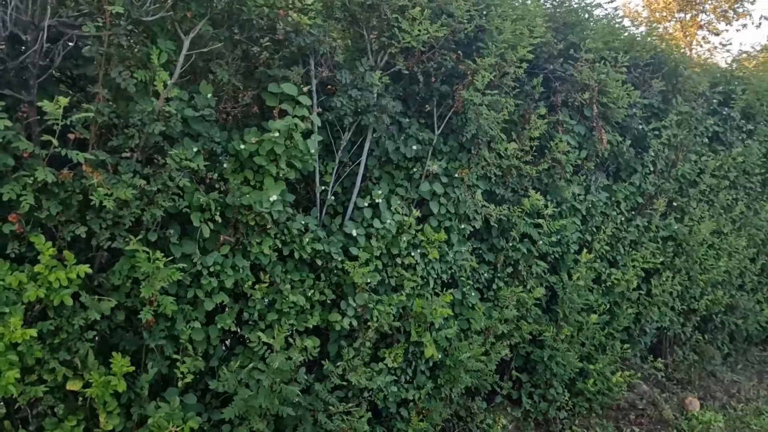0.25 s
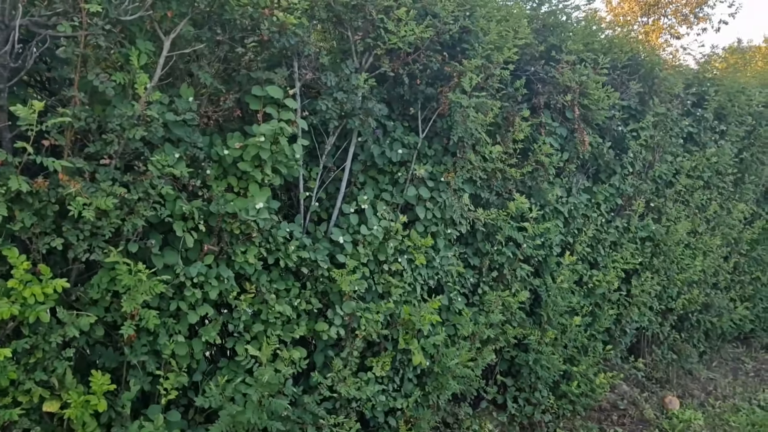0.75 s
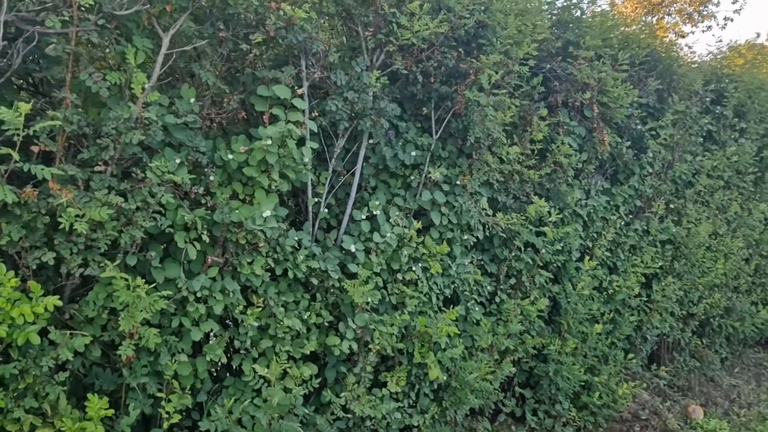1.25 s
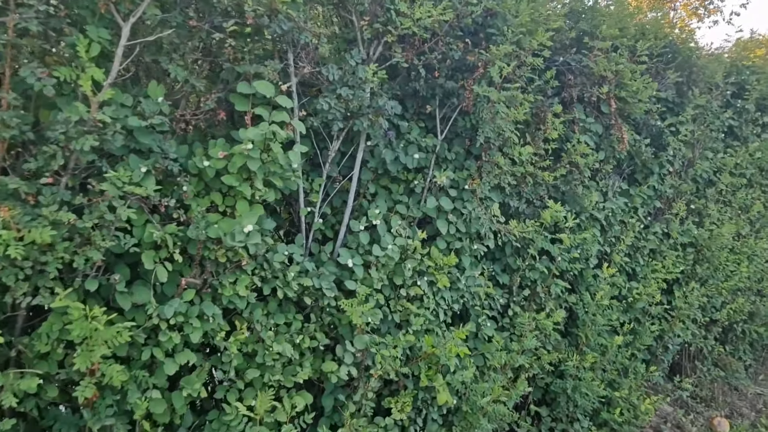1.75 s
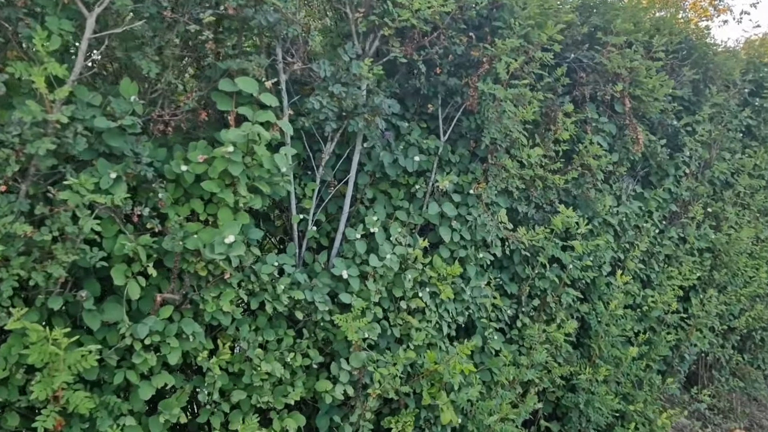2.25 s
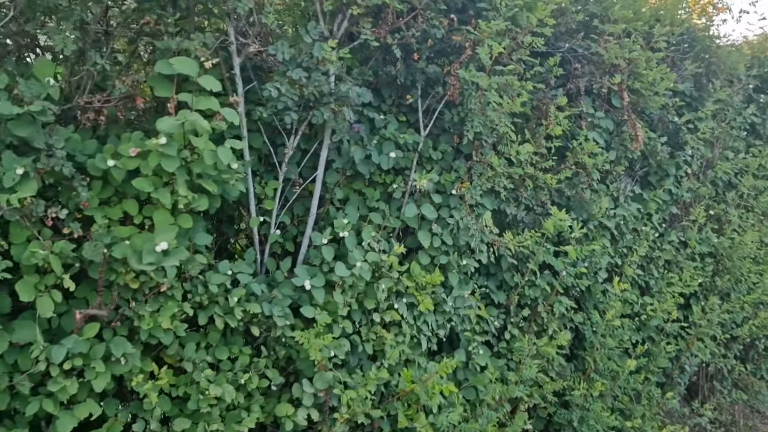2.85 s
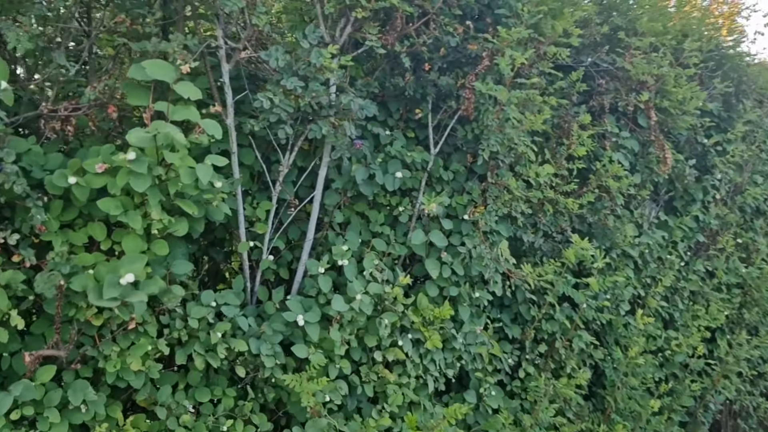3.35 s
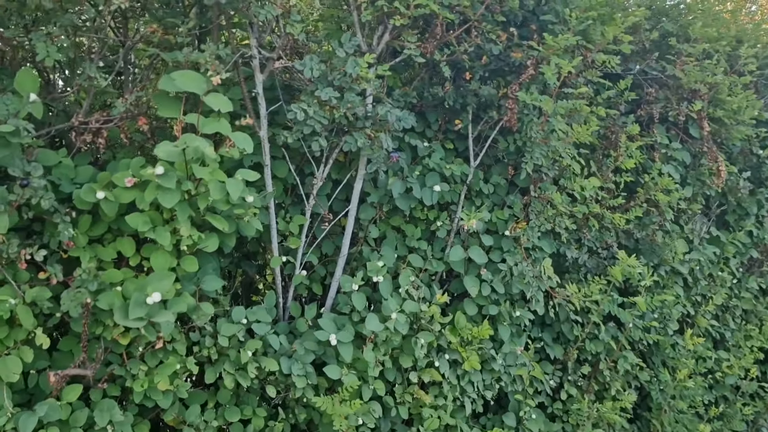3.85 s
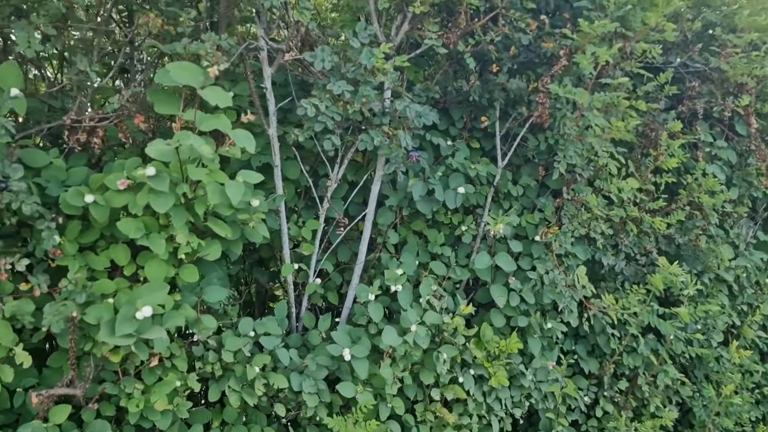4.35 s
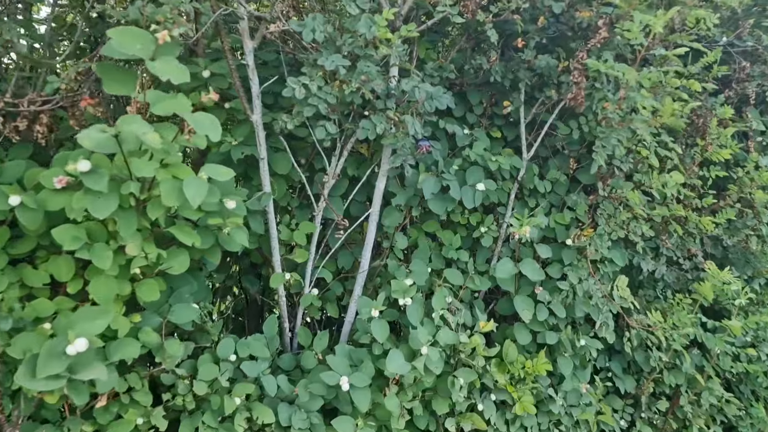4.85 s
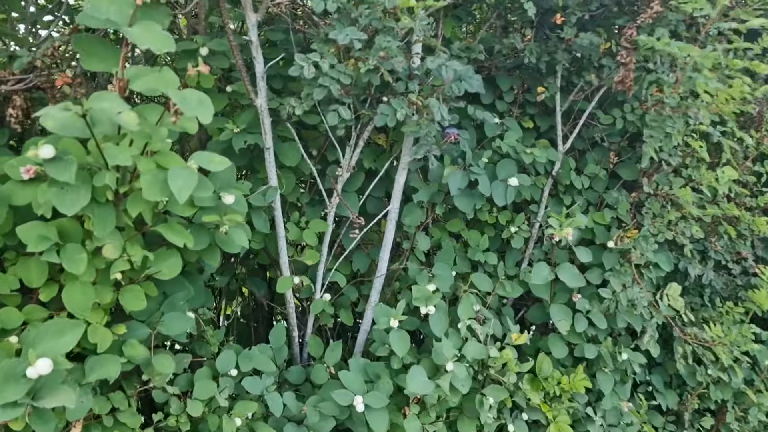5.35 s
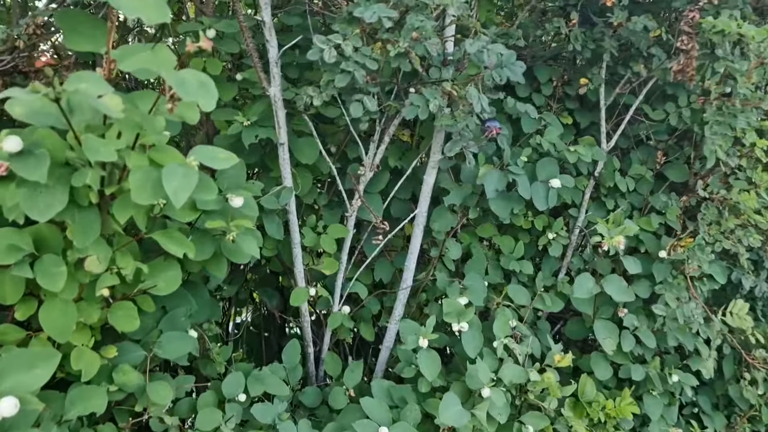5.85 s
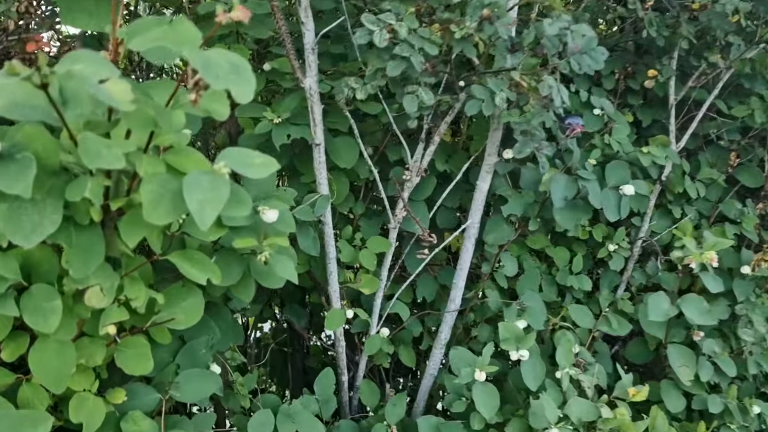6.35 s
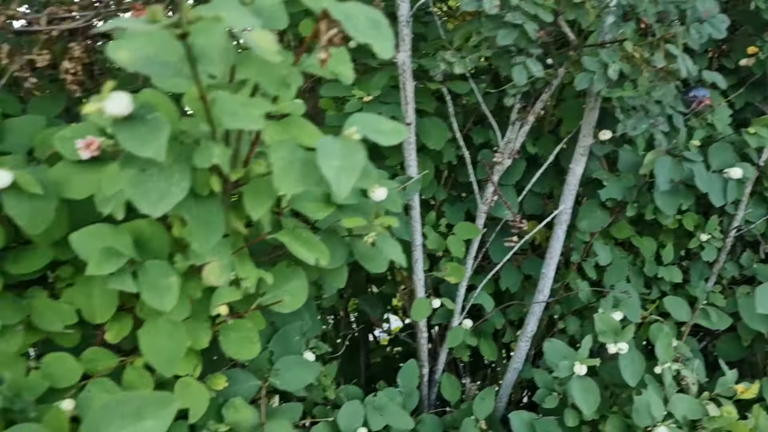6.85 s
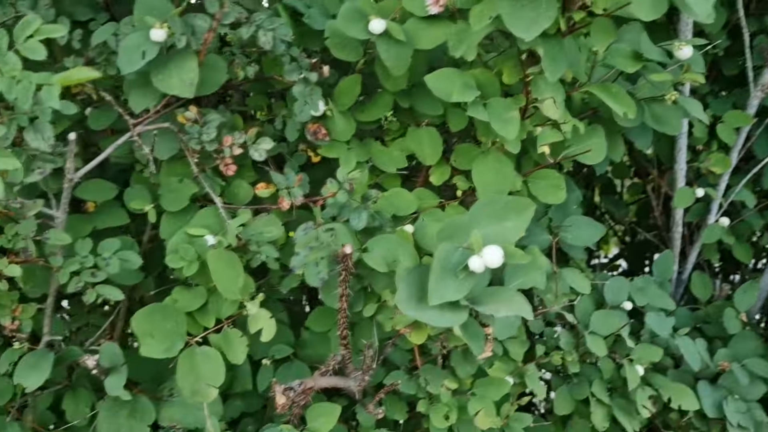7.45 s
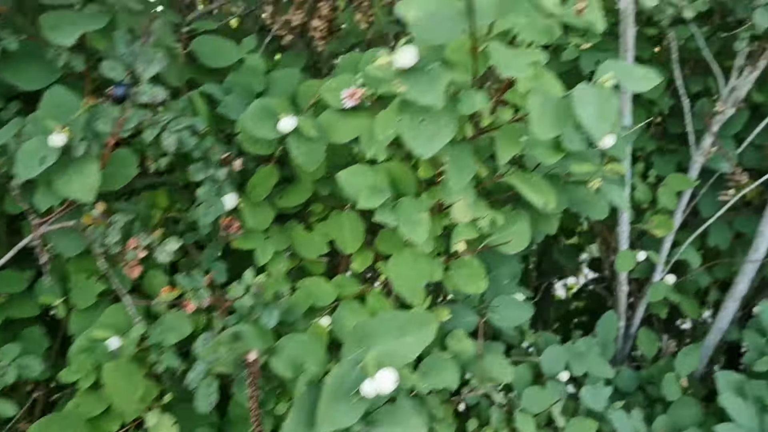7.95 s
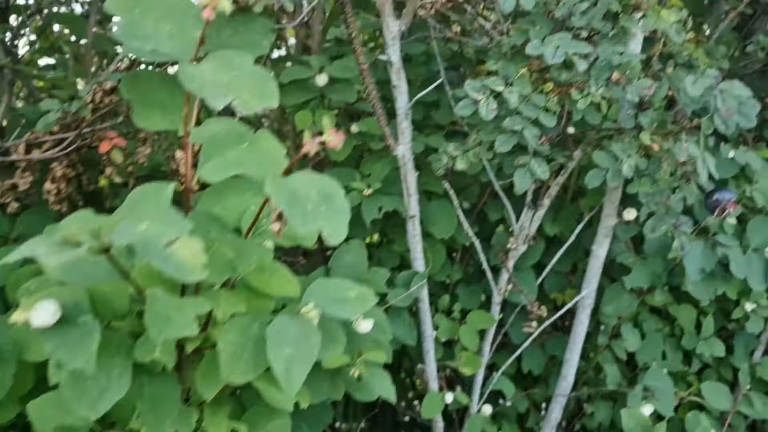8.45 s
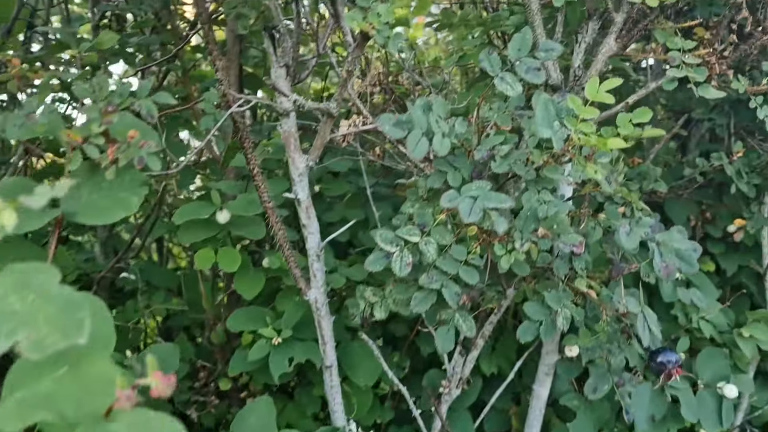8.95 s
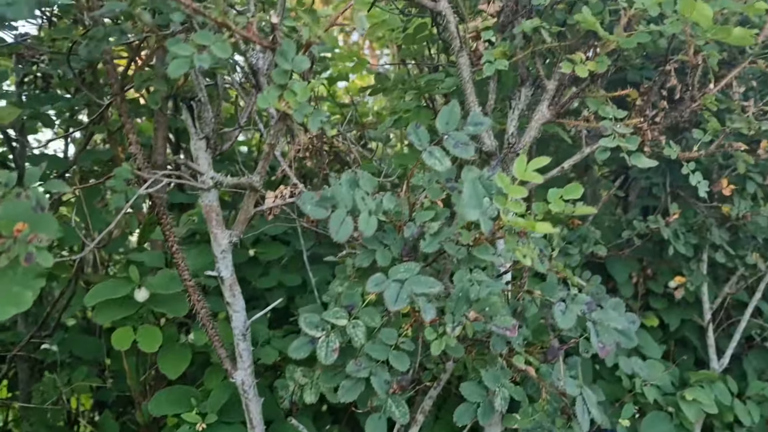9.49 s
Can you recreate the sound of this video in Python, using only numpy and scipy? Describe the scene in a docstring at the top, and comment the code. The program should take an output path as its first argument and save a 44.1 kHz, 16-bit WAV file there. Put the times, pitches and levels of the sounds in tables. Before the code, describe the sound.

A high cricket trill grows closer as someone walks through grass, cracks a twig sharply, and a second cricket joins in.

```python
"""In a garden, two bush crickets trill in a hedge while the listener walks up to it.
Each wing stroke drags a scraper over a row of tiny teeth; every tooth clicks, and leaves scatter
the clicks. The near cricket pauses once, and a faster one joins on the left.
Underneath are rumbling wind, a low drone, the hush of the air, far traffic and a faint whine.
Soft steps brush through the grass and twigs snap underfoot, one of them loudly."""
import sys
import numpy as np
from scipy import signal
from scipy.fft import rfft, irfft, next_fast_len
from scipy.io import wavfile
from scipy.ndimage import map_coordinates

SR = 44100
rng = np.random.default_rng(int(sys.argv[2]) if len(sys.argv) > 2 else 0)


def to_wav(sig):
    """Store sig (one row per channel, or 1-D mono) as 16-bit WAV at the path in sys.argv[1].

    Samples outside -1..1 are clipped; the rate is SR.
    """
    pcm = np.clip(np.atleast_2d(sig), -1, 1) * 32767
    pcm = np.round(pcm).astype(np.int16)
    wavfile.write(sys.argv[1], SR, pcm.T)  # frames by channels


N = 428631
TIME = np.arange(N) / SR

# When each cricket sings. Each row: start, end and peak of the first stroke, all in seconds.
NEAR_SONG_TIMES = [(0, 6.28, .01), (7.145, 9.72, 7.171)]
LEFT_SONG_TIMES = [(5.6, 9.72, 5.599)]
# How fast the wings beat. Each row: time in seconds, strokes per second.
NEAR_STROKE_RATE = [(0, 18.952), (1.57, 19.346), (3.14, 19.463), (4.71, 19.683), (6.28, 18.953),
                    (7.145, 18.727), (9.72, 19.456)]
LEFT_STROKE_RATE = [(5.6, 21.639), (9.72, 21.136)]
# Leaves before the near cricket. Each row: time in seconds, echo against straight sound in dB.
LEAF_COVER = [(0, 9), (1.25, 8), (1.5, 0), (3.25, 3.5), (3.65, -5), (5, -9.5), (6.3, -8), (7.15, 7.5),
              (7.95, 2), (8.35, -3), (8.8, 15), (9.3, -11.5), (9.72, -10)]

# The tone of each sound. Each row: frequency in Hz, relative level in dB.
NEAR_WING_TONE = [(2500, -63.5), (4000, -44), (5200, -27), (6200, -17.5), (6800, -9), (7250, 2.5),
                  (7900, -2.5), (8500, -2), (9200, -8.5), (10200, -18.5), (11500, -24), (13200, -21),
                  (14500, -15), (15700, -12.5)]
LEFT_WING_TONE = [(3000, -44), (5000, -34.5), (6300, -45), (7200, -12.5), (7900, -5.5), (8450, 3),
                  (8900, -0.5), (9600, -7.5), (10400, -5), (11300, -10), (12500, -11.5), (14000, -22),
                  (15300, -15), (16000, -49)]
WIND_TONE = [(20, -43), (32, -14), (44, -4.5), (49, -4), (56, 5), (63, 0.5), (72, -16), (120, -27),
             (300, -63.5)]
DRONE_TONE = [(45, -30), (56, -9.5), (69, -11.5), (88, 1), (101, -2), (114, -3.5), (130, -12.5),
              (180, -17.5), (300, -39.5), (600, -64.5)]
AIR_TONE = [(80, -37), (180, 1), (290, -2), (400, -0.5), (510, -3.5), (700, -3.5), (1000, -12),
            (1450, -8.5), (2000, -18), (2600, -24.5), (3500, -26.5), (8000, -15), (16000, -21)]
TYRE_TONE = [(300, -25), (520, -15), (650, 4.5), (820, 2), (1000, -14), (1500, -32), (3000, -64)]
ENGINE_TONE = [(110, -22), (180, -4), (300, -1), (450, -18.5), (900, -55)]
GRASS_TONE = [(400, -50), (1000, -5), (1600, -3), (2600, -5.5), (4000, -10), (8000, -5), (16000, -47)]
# How the song changes on its way. Each row: frequency in Hz, boost or cut in dB.
LEAF_SHADOW = [(5000, -9), (6800, -6), (7900, 1.5), (8700, -2), (9800, -3.5), (15000, -13)]  # leaves block the straight path
LEAF_BOUNCE = [(4200, -1.5), (5600, -2.5), (7000, 0), (12000, 0)]  # leaves reflect the song's low edge less well
LEAF_HISS = [(5000, 11), (8000, -14), (11000, 8), (15000, 7)]  # sound scattered many times over
OTHER_SIDE = [(4200, 4), (5400, -1.5), (7200, 0.3), (8500, -1), (10000, 4), (14000, 2.5)]  # the near cricket from another side, brighter

# Wind gusts. Each row: peak time in seconds, length in seconds, rise in dB.
WIND_GUSTS = [(.5, 0.69, 7), (1.384, 0.81, 8), (5.1, 0.35, 5), (5.7, .3, 5), (6.7, 0.38, 6.5),
              (7.75, 0.74, 6), (9.494, .2, 7.5)]
# How alike the air sounds in both ears. Each row: frequency in Hz, likeness (1 means the same).
AIR_LIKENESS = [(150, 0.88), (300, 0.82), (640, 0.062), (1400, 0.022), (6000, .1)]
# Far traffic. Each row: peak time and length in seconds, tyre level and engine level in dB.
PASSING_CARS = [(.5, 2.3, -56, -56.5), (4.65, 1.1, -55.5, -64), (6, 1.3, -58, -58.5),
                (7.802, 1.56, -53, -50.5)]
# Steady tones of far machinery. Each row: pitch in Hz, level in dB.
MACHINE_HUMS = [(289.6, -65.5), (596, -68.5), (1572, -78.5)]
# Swells of a far whine. Each row: peak time in seconds, length in seconds, pitch in Hz, level in dB.
WHINE_SWELLS = [(6.625, 0.53, 1410, -60.5), (7.35, .65, 1566, -62), (7.793, 0.45, 1553, -56.5),
                (9.65, 0.49, 1419, -64)]
# Steps in the grass. Each row: peak time in seconds, length in seconds, level in dB.
GRASS_STEPS = [(.4, .17, -58), (1.284, 0.15, -54), (1.666, 0.11, -55.5), (2.653, 0.16, -50.5),
               (3.35, 0.44, -60), (4.35, 0.37, -56), (5.098, 0.32, -55), (6.015, 0.58, -59.5)]
# Twigs underfoot. Each row: start in seconds, level in dB, ringing pitch in Hz,
# left over right in dB, splintering against the first crack in dB.
TWIG_SNAPS = [(1.278, -36, 1680, 8, -4), (1.699, -31.5, 1500, 7, -4), (2.71, -42, 1800, 5, 9),
              (4.25, -32, 1500, 5, 3), (4.4205, -6.5, 1370, 5.5, -13.5), (5.312, -30, 2640, -1, 1.5),
              (6.11, -42.5, 1901, 3, 9), (6.613, -40, 2600, 2, 3)]
# How a twig rings. Each row: multiple of its ringing pitch, relative level in dB.
TWIG_TONE = [(.1, -36), (.3, -23), (.68, -12), (1, -4.5), (1.35, -11.5), (2.1, -22), (2.8, -35), (5, -46),
             (10, -60)]


def amp(db):
    """Turn decibels into a gain to multiply by."""
    return 10 ** (np.asarray(db) / 20)


def unit(x):
    """Scale to an average (rms) level of 1."""
    return x / np.sqrt(np.mean(x ** 2) + 1e-20)


def unit_energy(x):
    """Scale each channel of a short sound to energy 1."""
    return x / np.linalg.norm(x, axis=-1, keepdims=True)


def along(points, hz):
    """Read between (Hz, value) points, with octaves evenly spaced."""
    freqs, values = np.transpose(points)
    return np.interp(np.log(hz + 1e-6), np.log(freqs), values)


def curve(rows):
    """Join (seconds, value) points with straight lines."""
    return np.interp(TIME, *np.transpose(rows))


def swell(s, length):
    """A smooth rise and fall of height 1 around time s."""
    return np.exp(-2 * ((TIME - s) / length) ** 2)


def wobble(rate):
    """A smooth random curve through rate points a second."""
    return map_coordinates(rng.standard_normal(int(N * rate / SR) + 4), [TIME * rate])


def pan(balance_db):
    """Left and right gains of constant power; positive is to the left."""
    gains = amp(np.outer([.5, -.5], balance_db))
    return gains / np.sqrt(np.mean(gains ** 2, axis=0))


def filtered(x, response):
    """Multiply each frequency in x by response(hz)."""
    size = next_fast_len(N + SR // 2)
    return irfft(rfft(x, size) * response(np.fft.rfftfreq(size, 1 / SR)), size)[..., :N]


def ring(tone, size=1024):
    """A click with this tone that starts sharply and rings out."""
    cepstrum = irfft(np.log(amp(along(tone, np.fft.rfftfreq(size, 1 / SR)))))
    cepstrum[1:size // 2] *= 2  # folding this way moves the energy to the start
    cepstrum[size // 2 + 1:] = 0
    return unit_energy(irfft(np.exp(rfft(cepstrum))))


def rush(tone, likeness):
    """Stereo noise at level 1; likeness says how alike the ears are at each frequency."""
    def response(hz):
        width = np.arccos(np.clip(along(likeness, hz), -1, 1)) / 2
        return amp(along(tone, hz)) * [np.cos(width), np.sin(width)]
    mid, side = filtered(rng.standard_normal((2, N)), response)
    return unit(np.array([mid + side, mid - side]))


def add(track, start, sound):
    """Mix a stereo sound into the track from sample number start."""
    track[:, start:start + sound.shape[1]] += sound[:, :N - start]


def wing_beat(song_times, pace):
    """Count wing strokes from the first of each trill, and mark when the cricket sings."""
    count = np.cumsum(curve(pace)) / SR
    strokes, singing = np.zeros(N), np.zeros(N)
    for start, end, first_peak in song_times:
        now = (TIME >= start) & (TIME < end)
        strokes[now] = count[now] - count[round(first_peak * SR)]
        singing[now] = 1
    return strokes, singing


def wing_stroke(place, skim_teeth_per_s=950, bite_teeth_per_s=365, rise_db=68, fall_db=162):
    """The scraper skims the teeth with growing force, bites and slows, then lifts off."""
    # place is in strokes from the peak; rise and fall are per whole stroke
    before_bite = np.maximum(-place - .07, 0)
    after_bite = np.maximum(place - .095, 0)
    level_db = np.maximum(-rise_db * before_bite - fall_db * after_bite, -45)
    skimming = np.minimum(before_bite / .07, 1)
    return bite_teeth_per_s + (skim_teeth_per_s - bite_teeth_per_s) * skimming, level_db


def tooth_clicks(song_times, pace, tooth_spread_db, stroke_spread_db=0, jitter_s=.0001):
    """One click for each tooth the scraper passes, a little uneven in force and timing."""
    strokes, singing = wing_beat(song_times, pace)
    place = (strokes + .015 * wobble(20) + .5) % 1 - .5
    teeth_per_s, level_db = wing_stroke(place)
    teeth = np.flatnonzero(np.diff(np.floor(np.cumsum(teeth_per_s) / SR)))
    harder, later = rng.standard_normal((len(teeth), 2)).T
    force = amp((level_db + stroke_spread_db * wobble(25))[teeth] + tooth_spread_db * harder)
    when = np.clip(teeth + jitter_s * SR * later, 0, N - 1).astype(int)
    return unit(np.bincount(when, force, N) * singing) * np.sqrt(singing.mean())


def straight_path(clicks, wing, lead_s):
    """Each click rings the wing briefly and reaches the left ear lead_s before the right."""
    ears = lambda hz: np.exp(np.pi * 1j * lead_s * np.outer([1, -1], hz))
    song = filtered(clicks, lambda hz: amp(along(wing, hz) + along(LEAF_SHADOW, hz)) * ears(hz))
    return unit(song) * np.std(clicks)


def leaf_echoes(clicks, wing, fade_s, memory, size=2048):
    """Echoes off leaves drift as the listener moves; more memory means slower drift."""
    blocks = np.pad(clicks, (0, -N % size)).reshape(-1, size)
    span, t = 4 * size, np.arange(2 * size) / SR
    noise = rng.standard_normal((len(blocks), 2, len(t)))
    drift = signal.lfilter([1], [1, -memory], noise, axis=0)
    paths = drift * amp(-60 * t / fade_s) * (1 - np.exp(-10 * t / fade_s))  # build up, then die away
    response = rfft(paths, span) * rfft(ring(wing), span)
    response /= np.sqrt(np.mean(abs(response) ** 2, axis=-1, keepdims=True))
    out = np.zeros((2, N))
    for k, echo in enumerate(irfft(response * rfft(blocks, span)[:, None], span)):
        add(out, k * size, echo)
    return out


def leaf_hiss(clicks, wing, fade_s=0.066):
    """Sound scattered many times over is a bright hiss that fills the gaps between strokes."""
    keep = np.exp(-1 / (fade_s * SR))
    power = signal.lfilter([1 - keep], [1, -keep], clicks ** 2)
    noise = rng.standard_normal((2, N))
    hiss = filtered(noise, lambda hz: amp(along(wing, hz) + along(LEAF_HISS, hz)))
    return np.sqrt(power) * unit(hiss)


def through_hedge(clicks, wing, cover_db, close_db, close_fade_s, hedge_fade_s, lead_s):
    """Blend straight sound, a smear from the closest leaves, the hedge's longer echo and hiss."""
    close, far = amp(cover_db + close_db), amp(cover_db)
    echoes = close * leaf_echoes(clicks, wing, close_fade_s, memory=0.45)
    echoes += far * leaf_echoes(clicks, wing, hedge_fade_s, memory=0.9)
    echoes = filtered(echoes, lambda hz: amp(along(LEAF_BOUNCE, hz)))
    song = (straight_path(clicks, wing, lead_s) + echoes) / np.sqrt(1 + close ** 2 + far ** 2)
    return song + amp(-18) * leaf_hiss(clicks, wing)


def near_cricket(approach_db_per_s=0.3863):
    """About 19 strokes a second, louder as the listener nears and crisper where leaves are fewer."""
    cover_db = curve(LEAF_COVER)
    turned = swell(7.52, 1.0)  # the listener swings left, away from this cricket, and back
    level_db = -27 + approach_db_per_s * TIME - 0.24 * cover_db - 4.5 * turned
    clicks = tooth_clicks(NEAR_SONG_TIMES, NEAR_STROKE_RATE, tooth_spread_db=1.47)
    song = through_hedge(clicks, NEAR_WING_TONE, cover_db, close_db=4.0,
                         close_fade_s=0.0048, hedge_fade_s=0.07, lead_s=-0.000017)
    brighter = filtered(song, lambda hz: amp(along(OTHER_SIDE, hz)))
    song = np.where(TIME < NEAR_SONG_TIMES[-1][0], song, brighter)  # switch after the pause
    return amp(level_db) * pan(0.4 - 3.5 * turned) * song


def wind(calm_db=-43.5):
    """A low rumble that rises with each gust."""
    gust_db = sum(rise_db * swell(s, length) for s, length, rise_db in WIND_GUSTS)
    return amp(calm_db + gust_db) * rush(WIND_TONE, [(30, 0.99), (150, 0.99)])


def far_drone(level_db=-39):
    """A steady low noise, alike in both ears."""
    return amp(level_db) * rush(DRONE_TONE, [(60, 1.0), (150, .98)])


def open_air(level_db=-48):
    """A wide, gently wavering hush."""
    return amp(level_db + 1.2 * wobble(7.1)) * pan(1.0) * rush(AIR_TONE, AIR_LIKENESS)


def far_road(quiet_db=-61):
    """Tyres roar faintly all the time; tyres and engine swell as each car passes."""
    passing_power = sum((amp(db) * swell(s, length)) ** 2 for s, length, db, _ in PASSING_CARS)
    tyres = np.sqrt(amp(quiet_db) ** 2 + passing_power) * rush(TYRE_TONE, [(500, 0.2), (1000, 0.15)])
    engine_gain = sum(amp(db) * swell(s, length) for s, length, _, db in PASSING_CARS)
    return pan(1.0) * (tyres + engine_gain * rush(ENGINE_TONE, AIR_LIKENESS))


def far_whine(waver_hz=12, flutter_db=3.0):
    """Steady machine hums and swelling tones flutter on their way through the air."""
    drift = waver_hz * np.cumsum(wobble(50)) / SR
    tone = lambda hz: np.sqrt(2) * np.sin(2 * np.pi * (hz * TIME + drift))
    steady = sum(amp(db) * tone(hz) for hz, db in MACHINE_HUMS)
    swelling = sum(amp(db) * swell(s, length) * tone(hz) for s, length, hz, db in WHINE_SWELLS)
    return (steady + swelling) * amp(flutter_db * np.array([wobble(25), wobble(25)]))


def footsteps(crunch_db=3.2, crackle_db=2.2):
    """Grass swishes and crackles under each step."""
    swish = sum(amp(db) * swell(s, length) for s, length, db in GRASS_STEPS)
    roughness = amp(crunch_db * wobble(50) + crackle_db * wobble(500))
    return swish * unit(roughness * rush(GRASS_TONE, [(1000, 0.78), (5000, 0.4)]))


def twigs(splinter_fade_s=0.09, size=4096):
    """Each dry twig cracks once, then its fibres splinter."""
    out = np.zeros((2, N))
    fade = amp(-60 * np.arange(size) / SR / splinter_fade_s)
    for s, db, hz, balance_db, splinter_db in TWIG_SNAPS:
        crack = ring([(multiple * hz, level) for multiple, level in TWIG_TONE])
        breaks = amp(splinter_db) * unit_energy(rng.standard_normal((2, size)) * fade)
        breaks[:, 0] += 1  # the first clean break
        snap = signal.fftconvolve(breaks, crack[None] / abs(crack).max(), axes=1)
        add(out, round(s * SR), amp(db) * pan(balance_db) * snap)
    return out


def left_cricket(level_db=-30.5, rise_db=8.5, rise_s=1.22):
    """A higher, quicker singer deeper in the hedge, growing louder after it joins."""
    faint = np.clip(1 - (TIME - LEFT_SONG_TIMES[0][0]) / rise_s, 0, 1)
    clicks = tooth_clicks(LEFT_SONG_TIMES, LEFT_STROKE_RATE, tooth_spread_db=2.5, stroke_spread_db=-0.8)
    song = through_hedge(clicks, LEFT_WING_TONE, cover_db=-6, close_db=7.5,
                         close_fade_s=0.0071, hedge_fade_s=0.085, lead_s=0.000443)
    return amp(level_db - rise_db * faint) * pan(6.5) * song


def scene():
    """Both crickets over the garden's background and the listener's steps."""
    crickets = near_cricket() + left_cricket()
    background = wind() + far_drone() + open_air() + far_road() + far_whine()
    return crickets + background + footsteps() + twigs()


def record(dry, top_hz=15900):
    """Cut away the very highest treble."""
    return filtered(dry, lambda hz: hz < top_hz)


dry = scene()
out = record(dry)
to_wav(out)
```